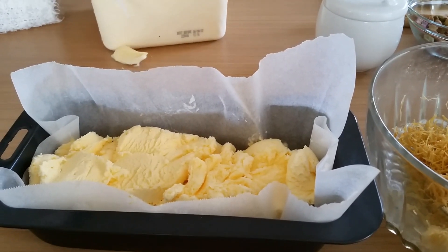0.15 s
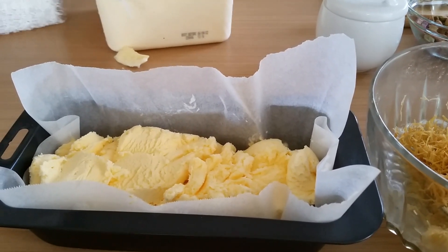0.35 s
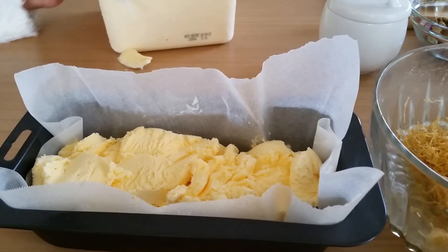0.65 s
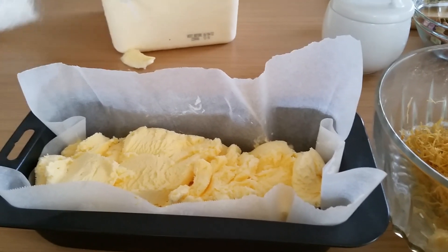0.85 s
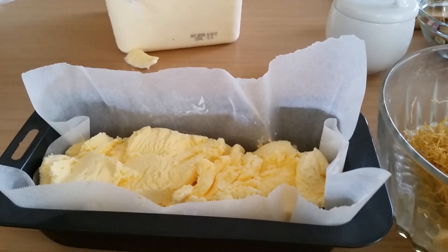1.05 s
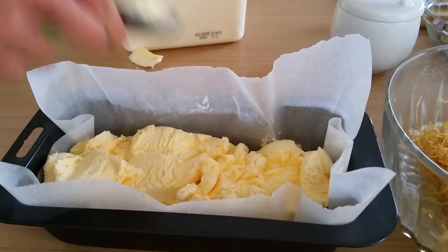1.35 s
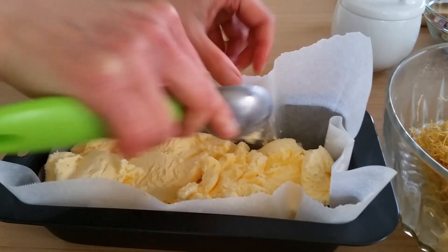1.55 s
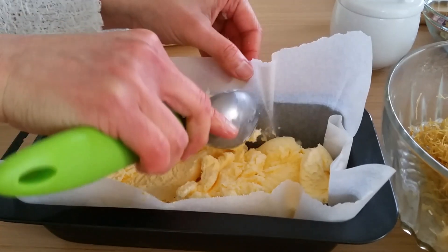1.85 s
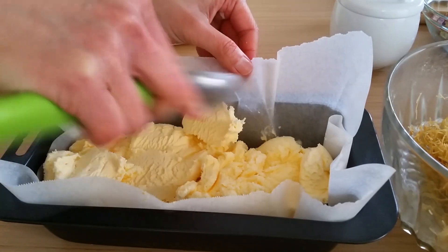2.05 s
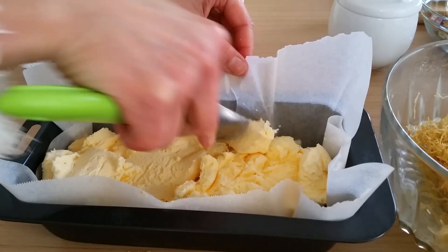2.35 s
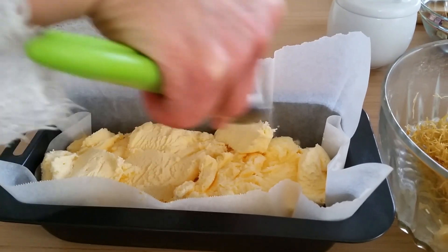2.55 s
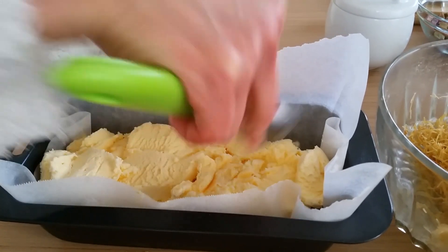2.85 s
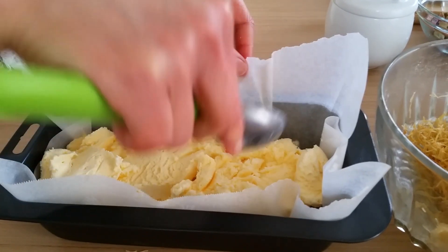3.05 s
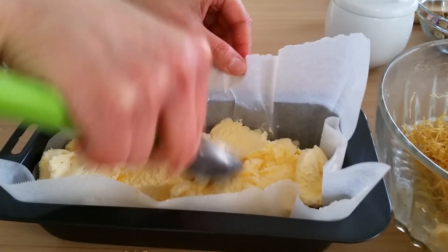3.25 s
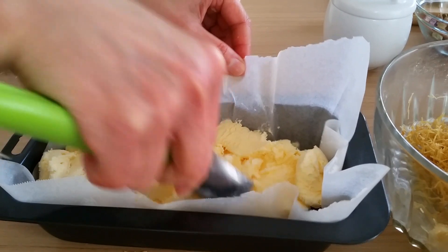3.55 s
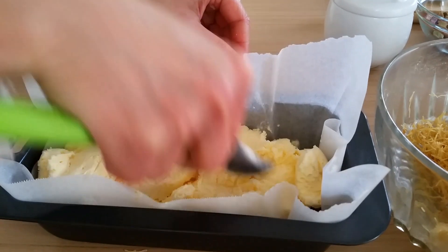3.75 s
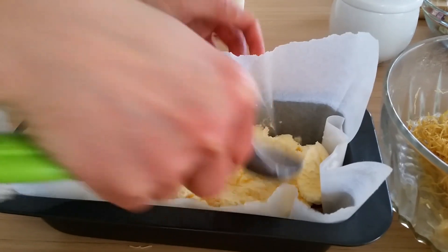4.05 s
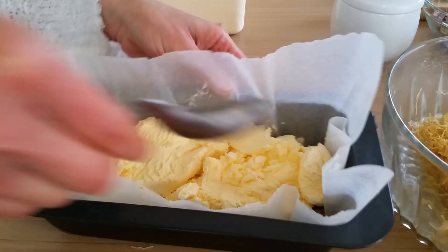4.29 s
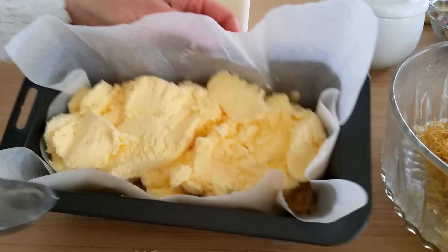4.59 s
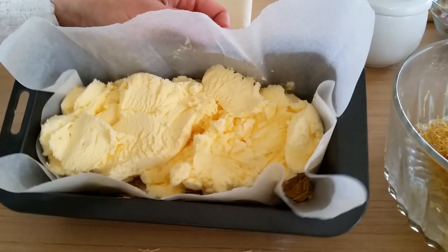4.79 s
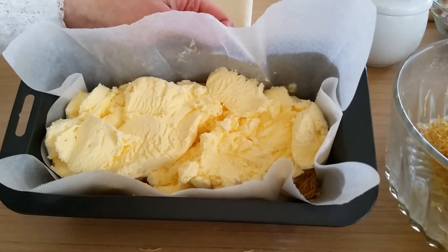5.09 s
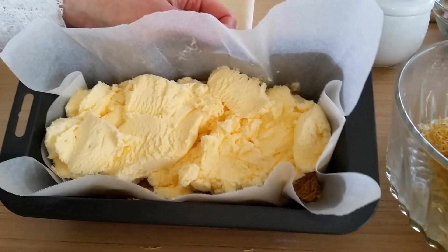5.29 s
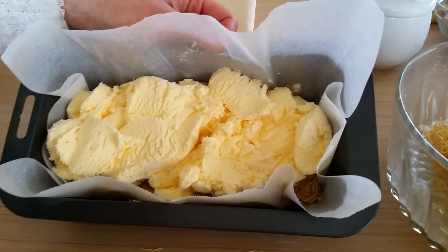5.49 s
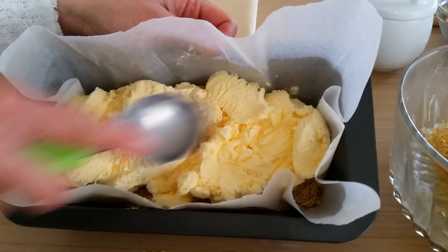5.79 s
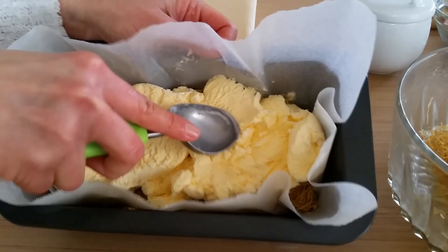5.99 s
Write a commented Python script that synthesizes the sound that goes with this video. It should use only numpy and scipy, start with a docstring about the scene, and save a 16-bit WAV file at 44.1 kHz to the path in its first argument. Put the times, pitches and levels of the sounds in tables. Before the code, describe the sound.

In a small kitchen, a low fridge hum runs steadily. After about a second, a metal scoop starts pressing soft ice cream into a paper-lined loaf tin, with small dry crackles and dull scrapes. Pushes grow stronger, peaking midway in a sharp paper snap and tinny clank, then a sliding scrape. A quiet pause follows before a short final rustle. Close stereo phone pickup, hands slightly left, short room echo.

```python
"""A fridge hums in a kitchen: shaped noise with narrow wavering tones. Soft bumps push through the table top.
Then a metal scoop presses soft ice cream into a loaf tin lined with baking paper, close to a phone on the table.
The paper rustles (random tiny folds over a hiss), cracks (short coloured noise bursts) and squeaks (wavering
tones); the tin rings under knocks and slides (fading sine modes), and short room echoes follow."""
import sys
import numpy as np
from scipy import signal
from scipy.fft import rfft, irfft
from scipy.io import wavfile
from scipy.ndimage import uniform_filter1d

SR = 44100
rng = np.random.default_rng(int(sys.argv[2]) if len(sys.argv) > 2 else 0)


def put_to_file(sound):
    """Save the sound as 16-bit audio at rate SR, in the file named by the first command-line argument."""
    columns = np.atleast_2d(sound).T  # one column per channel
    safe = np.clip(columns, -1, 1)
    whole_steps = np.round(safe * 32767)
    wavfile.write(sys.argv[1], SR, whole_steps.astype(np.int16))


N = 270333  # samples
HANDS_PAN_DB = 3.5  # left minus right: the hands work left of the phone


def undb(db):
    """Turn decibels into a plain gain."""
    return 10 ** (np.asarray(db) / 20)


def unit(x):
    """Scale a signal to an rms of 1."""
    return x / np.sqrt(np.mean(x ** 2))


def band(x, lo_hz, hi_hz, order=2):
    """Keep only the pitches between two limits; the upper one stays below 21000 Hz."""
    limits_hz = [lo_hz, min(hi_hz, SR / 2.1)]
    return signal.sosfilt(signal.butter(order, limits_hz, "bandpass", fs=SR, output="sos"), x)


def over_hz(table, size=N):
    """Read a (Hz, value) table at every transform bin, straight on a log axis."""
    hz, value = np.transpose(table)
    return np.interp(np.log(np.fft.rfftfreq(size, 1 / SR) + 1), np.log(hz + 1), value)


def walk(rate):
    """Smooth random wandering: levels held 1 / rate seconds, smoothed twice, with a spread near 1."""
    k = int(SR / rate)
    levels = np.repeat(rng.standard_normal(N // k + 1), k)
    smooth = uniform_filter1d(uniform_filter1d(levels, k), k)
    return unit(smooth[:N])


def panned(x, pan_db):
    """Make a left and a right side that differ by pan_db (left minus right)."""
    return x * undb(np.array([pan_db, -pan_db]) / 2).reshape(2, -1)


def add(track, s, sound):
    """Mix a sound into a track from s seconds on."""
    i = int(s * SR)
    n = min(sound.shape[-1], N - i)
    track[..., i:i + n] += sound[..., :n]


def fading(t60_s, force):
    """Let each push of a force die away by 60 dB in t60_s seconds."""
    return signal.lfilter([1], [1, -1000 ** (-1 / (t60_s * SR))], force)


# Fridge and room resonances. Each row: pitch in Hz, width in Hz, rms level in dB before swell and pan.
HUM = [(31, 3.9, -64.5), (62, 5.5, -62.5), (101.84, 8.4, -56), (132.6, 2.2, -61), (220.44, 3.2, -53.5),
       (233, 3.1, -61), (272.3, 24.5, -56.5), (326.8, 7, -63), (310, 9.1, -70.5), (383, 9.5, -64),
       (742, 53, -68)]
# Tone of the room noise. Each row: pitch in Hz, relative level in dB per Hz.
AIR = [(12, -23), (20, -29.5), (69, -10), (128, -0.5), (189, -4.5), (212, -1.5), (265, -2.5), (416, -12.5),
       (750, -19), (816, -21.5), (3140, -34.5), (3720, -24), (4930, -41), (15200, -103.5), (16500, -58)]
AIR_DB = -48  # rms of the broad noise before swell and pan
# How alike left and right are. Each row: pitch in Hz, likeness from 0 to 1.
AIR_LIKENESS = [(30, 0.3), (60, 0.9), (130, 0.93), (290, 0.91), (640, 0.7), (1400, 0), (3000, 0.07)]
# Which side is louder. Each row: pitch in Hz, left minus right in dB.
AIR_BALANCE = [(60, 2.5), (300, 1.5), (1000, -1), (2400, 0), (4000, -9), (8000, 21.5)]


def kitchen(swell_db=0.5):
    """Broad room noise, alike on both sides in most of the bass, with the narrow wavering tones of the fridge."""
    hz = np.fft.rfftfreq(N, 1 / SR)
    broad = undb(over_hz(AIR))
    power = undb(AIR_DB) ** 2 * broad ** 2 / np.sum(broad ** 2)
    for centre_hz, width_hz, db in HUM:
        peak = 1 / (1 + (2 * (hz - centre_hz) / width_hz) ** 4)
        power = power + undb(db) ** 2 * peak / peak.sum()
    like = np.clip(over_hz(AIR_LIKENESS), 0, 1)
    mid, side = rfft(rng.standard_normal((2, N))) * np.sqrt(power * N / 4)
    ports = mid * np.sqrt(1 + like) + side * np.sqrt(1 - like) * np.array([[1], [-1]])
    return irfft(panned(ports, over_hz(AIR_BALANCE)), N) * undb(swell_db * walk(4))


def port_hiss(db=-80, lo_hz=11000):
    """The faint high hiss of the two microphones: separate noise on each side."""
    return undb(db) * unit(band(rng.standard_normal((2, N)), lo_hz, 27000))


# Soft bumps through the table top.
# Each row: time in seconds, push level in dB before filter and pan, push length in ms, left minus right in dB.
BUMPS = [(0.295, -32.5, 1.94, 27.5), (2.08, -33, 3, -24), (2.443, -32.5, 2.3, 15), (2.532, -33.5, 2.8, -26),
         (2.661, -35, 2.8, -23), (3.018, -33.5, 3.2, -20), (4.359, -28.5, 1.9, 13), (6.047, -31.5, 3.9, 0)]


def bumps(rebound=0.11, low_hz=35):
    """One slow push of the table against the phone, then a smaller swing back."""
    out = np.zeros((2, N))
    for s, db, ms, pan_db in BUMPS:
        u = np.arange(-1.5, 5, 1000 / (ms * SR))  # time counted in push lengths
        push = np.exp(-(2 * u) ** 2)
        swing_back = rebound * np.exp(-(u - 1.6) ** 2)
        add(out, s - ms / 1000, panned(undb(db) * (swing_back - push), pan_db))
    return band(out, low_hz, 1000, order=1)


BITE_DB, BITE_S = 7, 0.015  # extra level at the start, and how fast it fades
SAG_DB_PER_S, RELEASE_DB_PER_S = 24.5, 287.5
SETTLE_DB, SETTLE_DB_PER_S = -20, 34.5  # level of the faint settling, and its fall


def stroke(t, start, rise, length):
    """Gain of one stroke: it rises, bites, sags while it lasts, lets go, and the paper settles faintly."""
    u = np.maximum(t - start, 0)
    held = np.clip(u - rise, 0, length)
    after = np.maximum(u - length, 0)
    body = undb(BITE_DB * np.exp(-held / BITE_S) - SAG_DB_PER_S * held - RELEASE_DB_PER_S * after)
    settling = undb(SETTLE_DB - SETTLE_DB_PER_S * u)
    return np.minimum(u / rise, 1) ** 2 * (body + settling)


# Ways the tin and the scoop ring, also used by the knocks.
# Each row: pitch in Hz, relative level in dB, undamped time in seconds to fade by 60 dB.
TIN = [(300, -13, .1), (490, -11, .12), (632, -4, .22), (735, -11, .07), (865, 0, .1), (945, -1.5, .1),
       (1025, -11, .12), (1195, -12, .12), (1455, -9, .06), (1575, -6, .07), (2530, -13, .09),
       (3040, -12, .09), (3900, -2, .11), (5840, -9, .08)]


def tin(force, t60_s=0.055, low_db=-4, top_hz=1000, wander_db=2.5, bend=.025):
    """The sheet metal's modes under a soft running force; as contact moves, each bends, comes and goes."""
    out = 0
    for hz, db, t60 in TIN:
        turn = np.exp(2j * np.pi * np.cumsum(hz * (1 + bend * walk(10))) / SR)
        gain = undb(db + low_db * (hz < 700) + wander_db * walk(35))
        gain = gain / np.hypot(1, (hz / top_hz) ** 2)  # a soft force stirs high modes less
        out = out + np.imag(turn * fading(min(t60, t60_s), force * gain / turn))
    return out


def within(t, spans):
    """1 inside any of the spans of time, 0 outside."""
    return sum((t > a) & (t < b) for a, b in spans)


# Pushes and drags of the scoop over paper and cream. Each row: start in seconds, rise in seconds,
# length in seconds, rustle level in dB, brightness above 7 kHz in dB against the rustle, tin scrape level in dB.
# The levels hold before the stroke's own gain and the pan.
STROKES = [(1.181, 0.054, 0.15, -57.5, -14, -55), (1.436, 0.012, 0.13, -63, -2, -55.5),
           (1.607, 0.0067, 0.056, -64.5, -12, -60.5), (1.658, 0.031, 0.1, -62.5, -24, -69),
           (1.751, 0.012, 0.084, -52, -1.5, -48), (1.883, 0.072, 0.09, -44.5, -13, -49.5),
           (2.017, 0.017, 0.067, -55, -37, -55), (2.28, 0.016, 0.14, -49, -9.5, -55.5),
           (2.836, 0.028, 0.22, -53, -5.5, -49.5), (3.107, 0.075, 0.12, -42, -2.5, -53.5),
           (3.37, 0.073, 0.25, -41.5, -6, -56), (3.459, 0.01, 0.13, -38.5, -17, -38.5),
           (3.579, 0.027, 0.06, -51, 1.5, -63.5), (3.818, 0.0046, 0.01, -52, -1.5, -53),
           (3.892, .01, 0.08, -52.5, -25.5, -49), (3.924, 0.0065, 0.32, -42, 3.5, -38),
           (4.354, 0.029, 0.17, -66, -2.5, -59), (5.457, 0.16, 0.23, -55, -4.5, -54),
           (5.688, 0.052, 0.13, -55.5, -8.5, -50.5), (5.815, 0.043, 0.051, -48.5, -0.5, -53),
           (6.038, 0.0087, 0.12, -56, -5, -48)]
# Tone of the rustle. Each row: pitch in Hz, relative level in dB per Hz.
RUSTLE_COLOUR = [(400, -41.5), (800, 7), (1200, -2.5), (2000, -0.5), (3500, -2.5), (5500, -5.5),
                 (7000, -7.5), (11000, -17.5), (16500, -24)]
# When the tin is loose enough to ring under scraping. Each row: from and to in seconds.
TIN_LOOSE = [(3.44, 4.55), (5.5, 5.95)]
# When the paper slides smoothly. Each row: from and to in seconds.
SLIDES = [(3.14, 3.26), (3.47, 3.55), (3.95, 4.6), (5.95, 6.2)]


def rustle(grains_per_s=550, scatter_db=1.5, grain_t60_s=0.011, hiss_db=-3.0, patchy_db=5.5,
           scrape_patchy_db=5.0, width=0.8, dull_db=-5, grind_patchy_db=3.5):
    """Many tiny folds give way at random over a sliding hiss; scraping grinds the cream or rings the loose tin."""
    t = np.arange(N) / SR
    start, rise, length, db, bright_db, tin_db = np.transpose(STROKES)
    strokes = np.array([stroke(t, *row) for row in zip(start, rise, length)])

    size = np.minimum(rng.exponential(size=N), 2.6)
    ticks = (rng.random(N) < grains_per_s / SR) * undb(scatter_db * size)
    grains = fading(grain_t60_s, ticks) * rng.standard_normal((2, N))
    folding = 1 - .55 * within(t, SLIDES)  # fewer folds are heard while the paper slides
    hiss = undb(hiss_db) * rng.standard_normal((2, N))
    sheet = (folding * unit(grains) + hiss) * undb(patchy_db * folding * walk(40))
    sheet = sheet[0] + width * sheet[1] * np.array([[1], [-1]])  # a wide sheet, not one point

    sheet = rfft(sheet) * undb(over_hz(RUSTLE_COLOUR))
    upper = 1 / (1 + (7000 / (np.fft.rfftfreq(N, 1 / SR) + 1)) ** 4)  # share above 7 kHz
    paper = unit(irfft(sheet * (1 - upper), N)) * (undb(db) @ strokes)
    paper = paper + unit(irfft(sheet * upper, N)) * (undb(db + bright_db) @ strokes)

    force = rng.standard_normal(N) * undb(scrape_patchy_db * walk(70))
    # the cream itself answers with a dull, unpitched grind
    rough = rng.standard_normal(N) * undb(grind_patchy_db * folding * walk(70))
    grind = unit(band(rough, 140, 750))
    loose = within(t, TIN_LOOSE)
    scrape = loose * unit(tin(force)) + undb(dull_db * loose) * grind
    return panned(paper, HANDS_PAN_DB), scrape * (undb(tin_db) @ strokes)


# Single folds of the paper snapping. Each row: time in seconds, peak in dB before panning, centre pitch in Hz.
CRACKS = [(1.224, -33, 2230), (1.2304, -33, 3000), (1.239, -39, 2000), (1.2565, -22.5, 4000),
          (1.275, -49, 2200), (1.3335, -42, 4300), (1.44, -28, 2370), (1.455, -20, 3260),
          (1.474, -33, 2500), (1.492, -31.5, 3920), (1.613, -26.5, 5400), (1.712, -33.5, 2360),
          (1.726, -38, 2730), (1.762, -17.5, 2220), (1.782, -23, 1780), (1.792, -13.5, 4020),
          (1.845, -20.5, 1730), (1.907, -35, 3480), (1.916, -32, 3000), (1.927, -21.5, 3370),
          (1.9428, -19.5, 4960), (1.9547, -21, 3990), (1.965, -22, 4450), (1.975, -15.5, 5470),
          (2.004, -36, 1800), (2.0697, -29.5, 2430), (2.0897, -33.5, 1590), (2.3039, -19.5, 3350),
          (2.3152, -18, 3620), (2.353, -24, 4910), (2.409, -29, 3800), (2.425, -27, 2220),
          (2.459, -33.5, 2500), (2.546, -39.5, 3340), (2.661, -31.5, 2120), (2.814, -34.5, 1960),
          (2.8218, -29, 2310), (2.838, -31, 4200), (2.859, -13, 3500), (2.959, -35, 1800),
          (2.971, -29.5, 2880), (2.989, -32, 2200), (3.005, -28.5, 3140), (3.02, -22.5, 2400),
          (3.041, -40, 3700), (3.137, -35.5, 2830), (3.1744, -23, 2890), (3.1945, -39.5, 5140),
          (3.2144, -35, 4210), (3.246, -24, 4870), (3.259, -15, 2844), (3.297, -39.5, 2680),
          (3.339, -34, 2310), (3.4018, -18.5, 4480), (3.4247, -23, 4800), (3.436, -31, 5000),
          (3.453, -20, 5660), (3.458, -21, 6460), (3.466, -2, 2820), (3.489, -10, 4420),
          (3.5586, -15.5, 6170), (3.574, -14, 4700), (3.611, -14.5, 5090), (3.6267, -9, 7450),
          (3.6396, -16, 5680), (3.824, -35, 2660), (3.8862, -25.5, 3740), (3.9304, -11.5, 1310),
          (3.935, -9, 3500), (4.3756, -38, 2030), (5.6116, -37, 3000), (5.62, -24.5, 5800),
          (5.6918, -36, 2920), (5.7155, -33, 3000), (5.737, -28, 1130), (5.748, -44, 2830),
          (5.7752, -26, 2000), (5.783, -36, 6500), (5.7902, -23.5, 6000), (5.8048, -9, 6050),
          (5.812, -18, 8200), (5.8527, -45, 3000), (5.863, -18.5, 6170), (5.899, -34, 3000)]
# The bowl of the scoop colours the snaps beside it. Each row: pitch in Hz, gain in dB.
BOWL = [(1300, 3.5), (1800, -4.5), (2400, 2.5), (3300, -5.5), (4800, -1.5), (6500, 0)]
FOLD_LAG, FOLD_LAG_SPREAD = 2, 2.5  # samples the left side comes late


def cracks(octaves=0.76, width_spread=0.34, wide_db=-13, rise_s=0.0032, t60_s=0.0093, likeness=0.65,
           tick=0.66):
    """Each snap is noise that starts with a tick, swells and dies in a few ms around its own centre pitch."""
    paper, size, lead = np.zeros((2, N)), 2048, 256  # lead: samples before the tick
    s, db, centre_hz = np.transpose(CRACKS)[:, :, None]
    t = np.maximum(np.arange(size) - lead, 0) / SR
    noise = rng.standard_normal((len(CRACKS), 3, size))
    shape = (1 - np.exp(-t / rise_s)) * 1000 ** (-t / t60_s)

    hz = np.fft.rfftfreq(size, 1 / SR) + 1
    width = octaves * np.exp(width_spread * noise[:, 1, :1])  # some folds ring narrow
    colour = np.exp(-.5 * (np.log2(hz / centre_hz) / width) ** 2)
    colour = colour + undb(wide_db) / np.hypot(1, 300 / hz) / np.hypot(1, (hz / 8000) ** 2)
    colour = colour * undb(over_hz(BOWL, size))

    like = np.clip(likeness, 0, 1)
    # a fold is heard a little differently on each side
    ports = like * noise[:, :1] + np.sqrt(1 - like ** 2) * noise[:, 1:]
    bursts = ports * shape + tick * (np.arange(size) == lead)
    snaps = irfft(rfft(bursts) * colour[:, None], size)
    for k, snap in enumerate(snaps):
        pan_db = HANDS_PAN_DB + 2 * noise[k, 0, 0]  # folds lie scattered over the sheet
        lag = FOLD_LAG + int(FOLD_LAG_SPREAD * noise[k, 2, 0])
        snap = np.array([np.roll(snap[0], lag), snap[1]])
        add(paper, s[k, 0] - lead / SR, panned(snap * undb(db[k]) / np.abs(snap).max(), pan_db))
    return paper


# Short squeaks of the scoop or a finger slipping on paper, and one very short sharp crack (at 3.6012 s).
# Each row: start in seconds, peak in dB before panning, middle pitch in Hz, length in ms (at least 1 is played).
SQUEAKS = [(1.313, -46, 2230, 5), (2.803, -32, 2220, 7.7), (2.857, -25, 2356, 9.3), (3.004, -34, 4140, 4.1),
           (3.018, -29, 2540, 4.2), (3.6012, -7.5, 6640, 0.82), (3.611, -30.5, 2375, 6.5),
           (3.625, -26, 6200, 8.7), (3.821, -44, 2780, 6.5), (3.84, -35, 2780, 7), (3.882, -45, 2680, 9),
           (3.906, -33.5, 3970, 12), (5.612, -28, 3620, 4.6), (5.613, -36, 1640, 3.8),
           (5.658, -35.5, 2240, 1.8), (5.748, -40, 5400, 5)]


def squeaks(waver=0.079, octave_db=-10, rough_db=2.0):
    """Stick and slip as a wavering tone with its octave, swelling and fading in a few ms; the shortest cracks."""
    out = np.zeros((2, N))
    for (s, db, hz, ms), luck in zip(SQUEAKS, rng.standard_normal((len(SQUEAKS), 2, 1024))):
        u = np.arange(luck.shape[1]) / (max(ms, 1) / 1000 * SR)  # 0 to 1 over the sound
        slow = np.array([unit(uniform_filter1d(row, size=40)) for row in luck])
        phase = 2 * np.pi * np.cumsum(hz * (1 + waver * slow[0])) / SR
        tone = np.sin(phase) + undb(octave_db) * np.sin(2 * phase)
        tone = tone * undb(rough_db * slow[1]) * np.sin(np.pi * np.minimum(u, 1))
        add(out, s, panned(undb(db) * tone / np.abs(tone).max(), HANDS_PAN_DB))
    return out


# The scoop meets the tin. Each row: time in seconds, peak in dB before filter and pan, best excited pitch in Hz,
# extra level in dB of the modes over 1300 Hz, ring length from 0 to 1 (at least 0.05 is played).
KNOCKS = [(1.44, -25.5, 496, -17, 0), (1.455, -24.5, 700, -15, 0), (1.762, -17.5, 790, 2, 0.02),
          (2.305, -26, 950, 8, 0.38), (2.859, -21.5, 910, 7, 0.08), (3.259, -25, 600, -12, 0.1),
          (3.467, -5, 860, 11, 0.71), (3.487, -13, 865, 5, 0.73), (3.501, -10.5, 940, 2, 0.52),
          (3.511, -15.5, 910, -11.5, 0.44), (3.54, -30, 760, -7.5, 0.2), (3.612, -30, 750, -8, 0.35),
          (3.823, -25, 820, -20, 0.1), (3.909, -26, 920, 3, 0.6), (3.929, -12, 980, -6, 0.37),
          (3.936, -13, 690, -3, 0.86), (4.018, -33, 630, -14, 0.77), (4.195, -32, 913, -20, 0.3),
          (5.806, -23.5, 900, 2, 0.37), (6.046, -27.5, 614, -22, 0.11)]


def knocks(blow_s=0.00048, fall_db_per_octave=16.5, lead_db=4.0, lead_octaves=0.3):
    """Each blow lands elsewhere, so the tin's modes get new weights; fingers and cream damp the ring."""
    out, t = np.zeros(N), np.arange(SR // 3) / SR
    hz, mode_db, t60 = np.transpose(TIN)[:, :, None]
    lucks = rng.standard_normal((len(KNOCKS), 2, len(TIN), 1))
    for (s, db, lead_hz, high_db, ring), luck in zip(KNOCKS, lucks):
        away = np.abs(np.log2(hz / lead_hz))  # octaves from the best excited pitch
        spot_db = lead_db * np.exp(-(away / lead_octaves) ** 2) - fall_db_per_octave * away
        weight = undb(mode_db + np.where(hz > 1300, high_db, spot_db) + 1.5 * luck[0])
        fade = 1000 ** (-t / (t60 * np.clip(ring, .05, 1.5)))
        modes = -weight * np.sin(2 * np.pi * hz * t + np.pi * ring * luck[1]) * fade
        blow = modes.sum(axis=0) * (1 - 1000 ** (-t / blow_s))  # soft onset
        add(out, s, undb(db) * blow / np.abs(blow).max())
    return band(out, 150, SR, order=2)  # the knocks carry nothing below about 150 Hz


ROOM_T60_S, ROOM_DB, ROOM_TOP_HZ, ROOM_ALIKE_HZ = 0.33, -14, 4000, 1210


def room(x):
    """Dense echoes that start a few ms late; long waves reach both sides alike."""
    t = np.arange(SR // 2) / SR
    mid, side = rng.standard_normal((2, len(t)))
    alike = band(mid, 160, ROOM_TOP_HZ, order=1)
    unlike = band(side, ROOM_ALIKE_HZ, ROOM_TOP_HZ, order=1) * np.array([[1], [-1]])
    tail = (alike + unlike) * 1000 ** (-t / ROOM_T60_S) * (t > .003)
    return signal.fftconvolve(x, undb(ROOM_DB) * tail / np.linalg.norm(tail[0]), axes=1)[:, :N]


LEFT_LAG = 5  # samples


def scene():
    """Mix the paper, tin and squeaks with their echoes, the bumps, the kitchen and the hiss."""
    sheet, scrape = rustle()
    slips, metal, air = squeaks(), panned(knocks() + scrape, 0.2), kitchen()
    for sound in (slips, metal, air):
        sound[0] = np.roll(sound[0], LEFT_LAG)  # these reach the right side first
    near = cracks() + sheet + metal
    echoes = room(near + undb(-12) * slips)  # squeaks stir the room little
    return near + slips + echoes + bumps() + air + port_hiss()


def record(dry):
    """Cut the top steeply above 15900 Hz."""
    return signal.sosfilt(signal.ellip(12, .2, 85, 15900, fs=SR, output="sos"), dry)


dry = scene()
out = record(dry)
put_to_file(out)
```